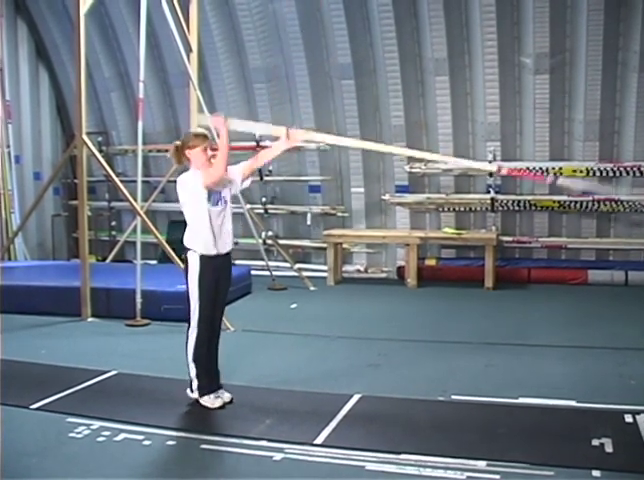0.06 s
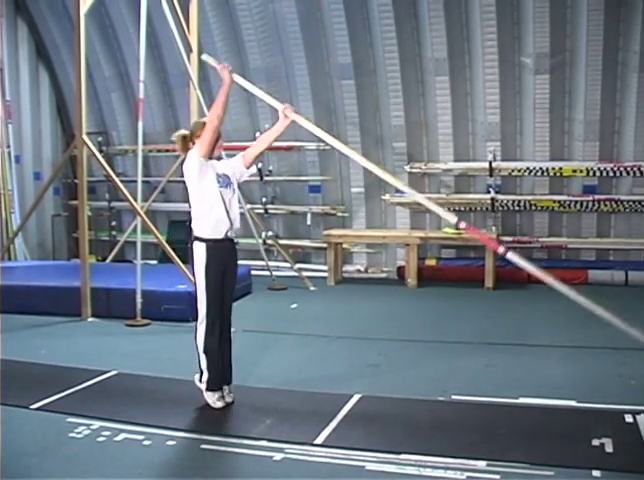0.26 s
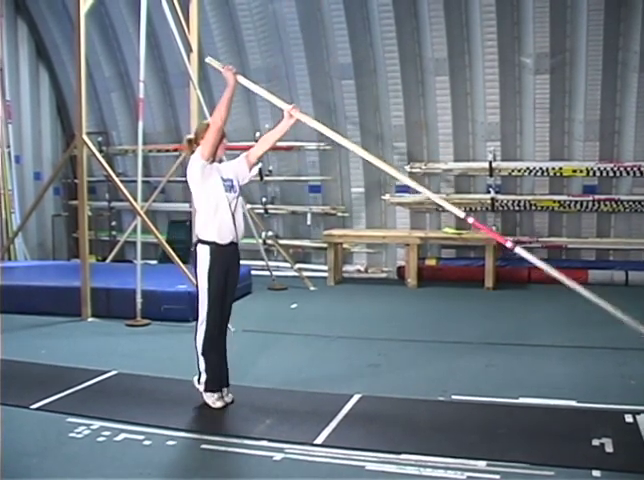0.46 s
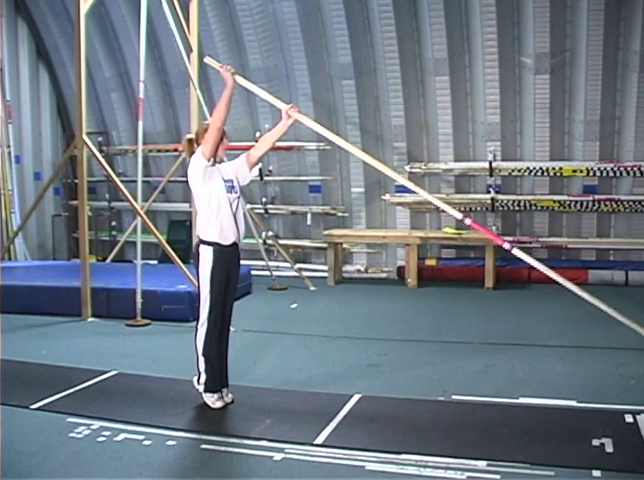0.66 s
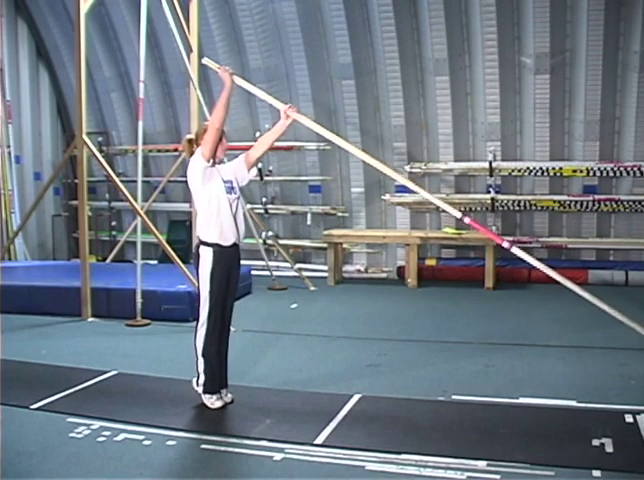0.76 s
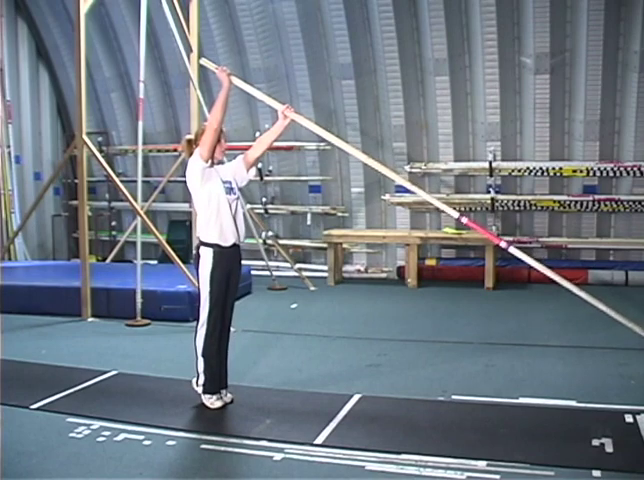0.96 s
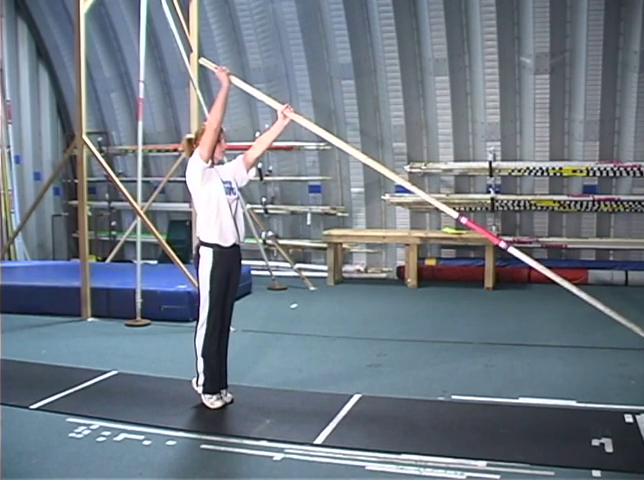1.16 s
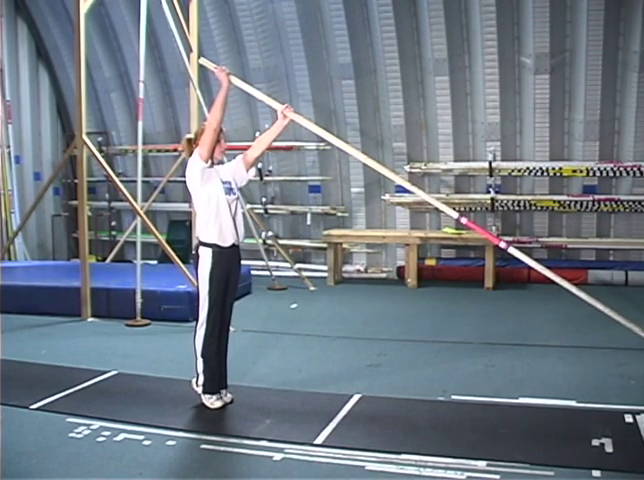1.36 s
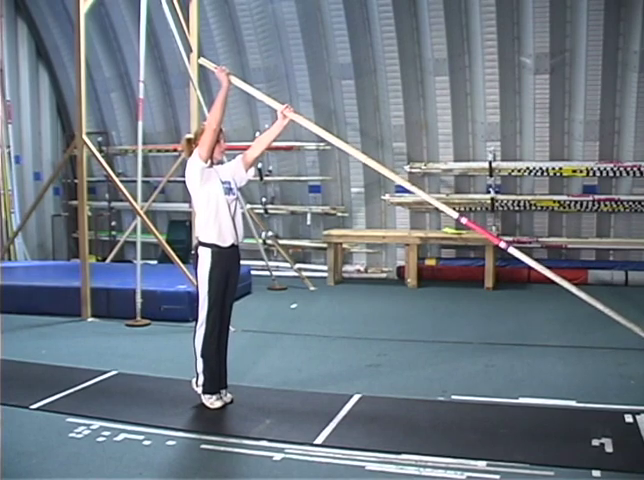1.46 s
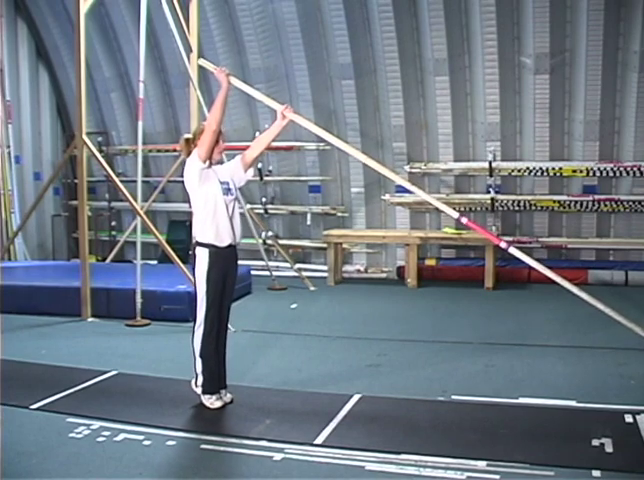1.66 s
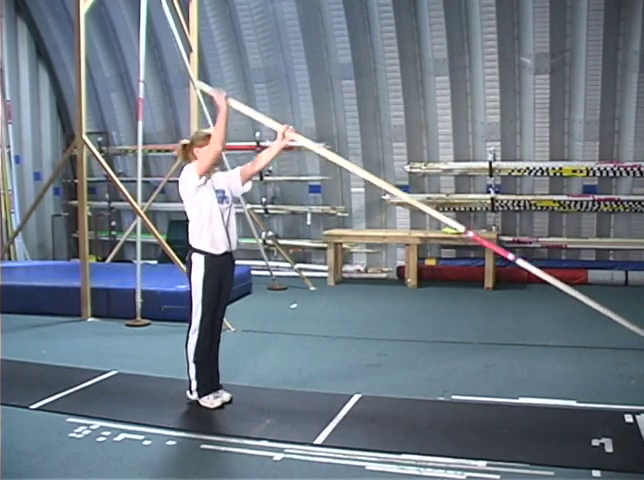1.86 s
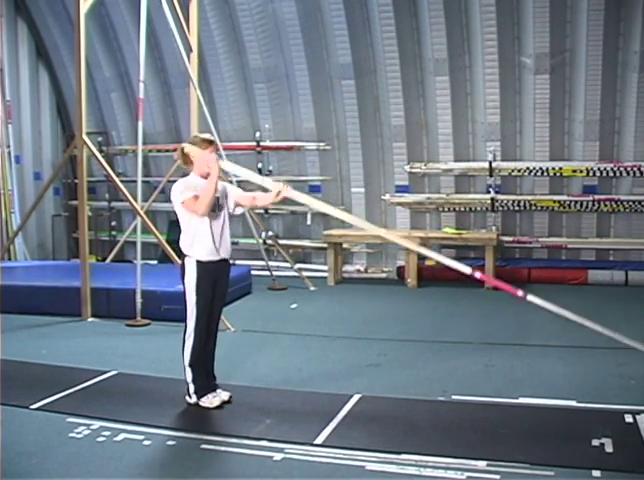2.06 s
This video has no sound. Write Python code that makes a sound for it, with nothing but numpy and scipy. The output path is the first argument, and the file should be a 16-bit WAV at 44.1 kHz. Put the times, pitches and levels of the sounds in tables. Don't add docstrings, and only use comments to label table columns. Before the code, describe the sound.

A long hollow pole slaps onto a rubber runway: after quiet hall air, sleeve rustle, a grip creak at 0.1 s and a shoe thump at 0.18 s, the tip cracks loudly at 0.23 s with a hollow boom. A softer, duller bounce follows at 0.5 s. Low echo near 190 and 390 hertz fades through the metal hall; faint creaks, rustle and soft steps come from 1.6 to 2.1 s over faint motor hiss.

```python
import sys
import numpy as np
from scipy import signal
from scipy.fft import rfft, irfft
from scipy.io import wavfile
from scipy.ndimage import uniform_filter1d

SR = 44100
rng = np.random.default_rng(int(sys.argv[2]) if len(sys.argv) > 2 else 0)


def persist_wave(psi):
    counts = np.round(np.clip(psi, -1, 1) * 32767).astype(np.int16)
    wavfile.write(sys.argv[1], SR, np.atleast_2d(counts).T)


def field_ratio(decibels):
    return 10 ** (np.asarray(decibels, dtype=float) / 20)


N = 92610


def rms_one(x):
    return x / np.sqrt(np.mean(x ** 2) + 1e-20)


def at_hz(points, hz):
    table_hz, value = np.transpose(points)
    return np.interp(np.log(hz), np.log(table_hz), value)


def filtered(x, order, cut_hz, kind="low"):
    return signal.sosfilt(signal.butter(order, cut_hz, kind, fs=SR, output="sos"), x)


def ring(x, hz, t60_s):
    r = field_ratio(-60 / (t60_s * SR))
    w = 2 * np.pi * hz / SR
    return signal.lfilter([0, np.sin(w)], [1, -2 * r * np.cos(w), r * r], x + 1e-18)


def click(time_s, height):
    out = np.zeros(N)
    index = (np.atleast_1d(time_s) * SR).astype(int)
    np.add.at(out, np.clip(index, 0, N - 1), height)
    return out


def knocks(rows):
    return sum(ring(click(s, field_ratio(db)), hz, t60_s) for s, db, hz, t60_s in rows)


def coloured(spectrum):
    hz = np.maximum(np.fft.rfftfreq(N, 1 / SR), 1)
    edge = (hz > spectrum[0][0] / 2) & (hz < 15800)
    return rms_one(irfft(rfft(rng.standard_normal(N)) * field_ratio(at_hz(spectrum, hz)) * edge, N))


# (frequency [Hz], density [dB per Hz])
AIR_COLOUR = [(15, -5), (25, 12), (137, -2), (179, -1.5), (402, -9.5), (767, -12), (1030, -18.5),
              (1390, -23), (15700, -30)]


def air():
    return field_ratio(-56) * coloured(AIR_COLOUR)


# (time [s], level [dB])
RUSTLE_LEVEL = [
    (0, -67.5),
    (.2, -65.5),
    (.5, -57.5),
    (1.72, -117),
    (1.86, -63),
    (1.9, -64.5),
    (1.94, -66.5),
    (1.96, -63),
    (2.1, -62),
]
# (frequency [Hz], density [dB per Hz])
RUSTLE_COLOUR = [(500, -34), (900, 9), (1500, 7.5), (2200, 1), (4000, -5.5), (10000, -13)]


def rustle():
    flicker_db = rms_one(uniform_filter1d(rng.standard_normal(N), size=900))
    level_db = np.interp(np.arange(N) / SR, *np.transpose(RUSTLE_LEVEL)) + flicker_db
    return field_ratio(level_db) * coloured(RUSTLE_COLOUR)


def motor():
    centre_hz, width_hz, hiss_db = 4690, 330, -77.5
    line_hz, line_db = 15732, -85
    hiss = rms_one(ring(rng.standard_normal(N), centre_hz, 4.0 / width_hz))
    line = np.sin(2 * np.pi * line_hz * np.arange(N) / SR)
    return field_ratio(hiss_db) * hiss + field_ratio(line_db) * line


# (time [s], length [s], slip rate [1/s], centre [Hz], level [dB])
CREAKS = [
    (.085, .045, 170, 1500, -52),
    (1.582, .008, 80, 2700, -57),
    (1.7335, .008, 85, 3250, -54),
    (1.755, .02, 85, 3300, -57),
    (1.781, .085, 97, 1500, -52),
    (1.793, .055, 97, 2700, -58),
    (1.875, .045, 150, 1000, -56),
    (1.952, .05, 130, 1300, -53),
    (2.09, .005, 80, 6000, -59),
]


def creaks():
    fade_db_per_s, t60_s, split_hz = 20, .008, 280
    out = np.zeros(N)
    for s, length_s, rate, hz, db in CREAKS:
        jitter, luck_db = rng.standard_normal((20, 2)).T
        times_s = s + (np.arange(20) + .08 * jitter) / rate
        height = field_ratio(db + luck_db - fade_db_per_s * (times_s - s))
        slips = click(times_s, (times_s < s + length_s) * height)
        pair = ring(slips, hz - split_hz, t60_s) + ring(slips, hz + split_hz, t60_s)
        out += filtered(pair, 2, [hz / 1.4, hz * 1.4], "band")
    return out


# (time [s], level [dB], frequency [Hz], t60 [s])
STEPS = [
    (0.182, -38, 177, 0.04),
    (0.19, -56, 367, 0.24),
    (1.91, -47.5, 160, 0.09),
    (1.999, -48.5, 206, 0.12),
]


def steps():
    return -knocks(STEPS)


# (time [s], level [dB], centre [Hz], t60 [s])
SNAPS = [
    (.2275, -20.5, 3600, 0.015),
    (.2301, -7, 4320, 0.008),
    (0.2291, -16, 8270, 0.0051),
    (0.2323, -7, 1120, 0.006),
    (.2302, -39, 13000, 0.0044),
    (0.2305, -17, 2310, 0.05),
    (0.2406, -36.5, 6400, 0.036),
    (.5003, -49, 9600, 0.012),
    (0.5022, -35.5, 8450, 0.019),
    (0.5097, -45, 8900, 0.08),
]


def snaps():
    out, t = np.zeros(N), np.arange(N) / SR
    for s, db, hz, t60_s in SNAPS:
        wide = 1.8 if hz < 7500 else 1.4
        decay = (t >= s) * field_ratio(-60 * np.clip(t - s, 0, 1) / t60_s)
        burst = rng.standard_normal(N) * decay
        out += field_ratio(db) * filtered(burst, 3, [hz / wide, min(hz * wide, .36 * SR)], "band")
    return out


# (time [s], strength [dB], contact cut-off [Hz], signed push [factor, sign gives direction])
BLOWS = [
    (0.2283, -3.5, 1620, -0.47),
    (0.2292, -4, 1930, 0.78),
    (0.2434, -11, 700, 0.73),
    (0.5024, -14, 510, 0.43),
]
# (frequency [Hz], level [dB], t60 [s])
MODES = [(99, 8.5, 0.027), (188, -2, 0.48), (239.7, -3.5, 0.6), (337, 4.5, 0.036), (388, 1.5, 0.17),
         (456, 1.5, 0.065), (534, -11.5, 0.11), (732, -3.5, 0.02), (884, -4.5, 0.053), (1590, 2.5, 0.0068),
         (2330, -5.5, 0.057)]


def pole():
    out = np.zeros(N)
    luck_db = rng.normal(0, 0.67, (len(BLOWS), len(MODES)))
    for (s, db, cut_hz, way), row_db in zip(BLOWS, luck_db):
        push = filtered(click(s, way * field_ratio(db - 18)), 2, cut_hz)
        for (hz, level_db, t60_s), extra_db in zip(MODES, row_db):
            out += field_ratio(level_db + extra_db) * ring(push, hz, t60_s)
    return out


# (frequency [Hz], density [dB per Hz])
HALL_COLOUR = [(80, -13), (190, -9), (450, -5.5), (1100, -23.5), (2600, -23.5), (3250, -27), (3700, -43),
               (9000, -46.5)]
# (frequency [Hz], t60 [s])
HALL_T60 = [(60, 0.5), (160, 1.79), (420, 1.855), (1100, 1.4), (2900, 1.027), (6000, 0.78), (12000, 0.14)]


def hall(ringing):
    level_db, delay_s, rise_s, top_hz = -10, 0.0013, 0.042, 10400
    main_s, bounce_s = BLOWS[1][0], BLOWS[3][0]
    bounce = filtered(click(bounce_s, field_ratio(-17)), 2, 380)
    bounce = bounce + filtered(click(bounce_s, field_ratio(-14.5)), 6, 3060)
    source = click(main_s, 1) + bounce + field_ratio(-45) * ringing
    t = np.arange(N) / SR - delay_s
    edges_hz = 40 * 2 ** np.arange(0, 8.7, 1 / 3)
    white = rng.standard_normal((2, N))
    echo = 0
    for k, (low, high) in enumerate(zip(edges_hz, edges_hz[1:])):
        hz = np.sqrt(low * high)
        t60_s = np.maximum(at_hz(HALL_T60, hz), .1)
        band = filtered(white[k % 2], 2, [low, high], "band")
        echo = echo + band * field_ratio(at_hz(HALL_COLOUR, hz) - 60 * t / t60_s)
    swell = 1 - np.exp(-np.maximum(t, 0) / rise_s)
    return field_ratio(level_db + 14) * signal.fftconvolve(source, filtered(echo, 4, top_hz) * swell)[:N]


# (time [s], level [dB], frequency [Hz], t60 [s])
BOOMS = [(.2445, -24, 188, 0.95), (.5015, -37, 109, 0.077), (.5022, -20, 152.6, 0.074),
         (.5065, -33, 2010, .03), (.5070, -33.5, 2370, 0.058), (.5152, -14, 194.6, 0.16),
         (.5155, -23.5, 389, 0.077), (.61, -31, 184, 0.49), (.345, -21.5, 388, 0.17),
         (.325, -29.5, 185.8, 0.69), (.70, -37.5, 394.3, 0.58)]


def booms():
    return knocks(BOOMS)


def scene():
    body = field_ratio(6.5) * pole() + booms()
    crack = field_ratio(-4) * snaps()
    mid = body + crack + hall(body) + creaks() + steps()
    mid = mid + rustle() + motor() + air()
    mid = filtered(mid, 2, 36, "high")
    side = field_ratio(-18) * filtered(np.roll(crack, 9), 1, 400, "high")
    return np.array([mid + side, mid - side])


def lose_masked_treble(x):
    hz, _, z = signal.stft(x, SR, nperseg=2048)
    power = np.abs(z[0]) ** 2
    band = power[:1024].reshape(64, 16, -1).mean(axis=1).repeat(16, axis=0)
    audible = band > field_ratio(2 * -70) * power.sum(axis=0)
    z[:, :1024] *= audible | (hz[:1024, None] < 8500)
    return signal.istft(z, SR, nperseg=2048)[1][:, :N]


def band_limit(x):
    return signal.sosfilt(signal.butter(12, 16520, fs=SR, output="sos"), x)


def record(dry):
    flat = dry / (1 + (dry / .56) ** 4) ** 0.25
    mix = lose_masked_treble(flat)
    return band_limit(mix)


dry = scene()
out = record(dry)
persist_wave(out)
```